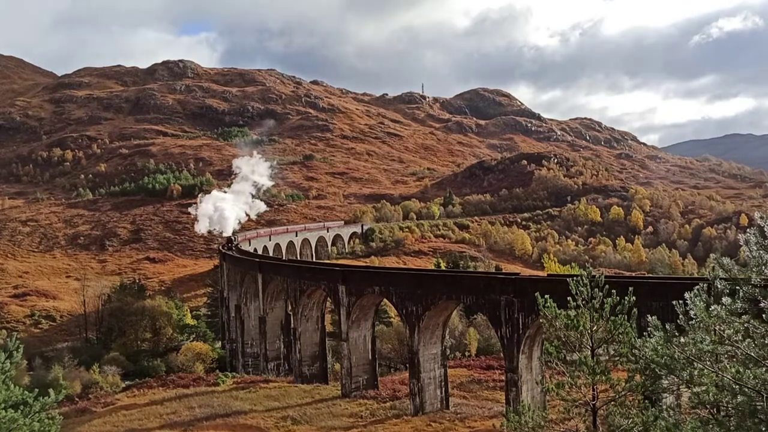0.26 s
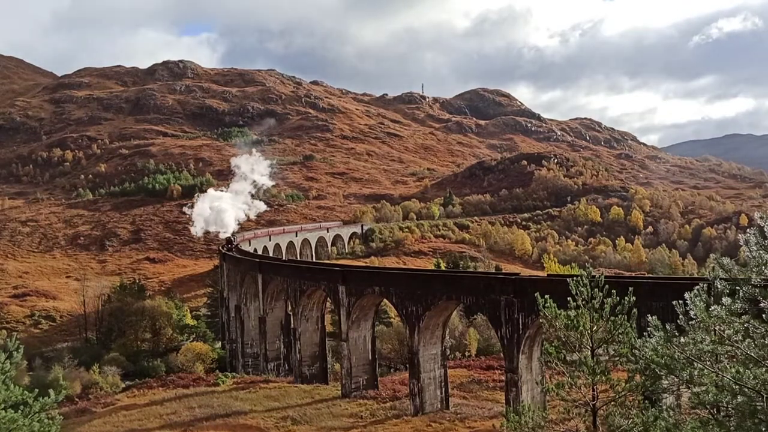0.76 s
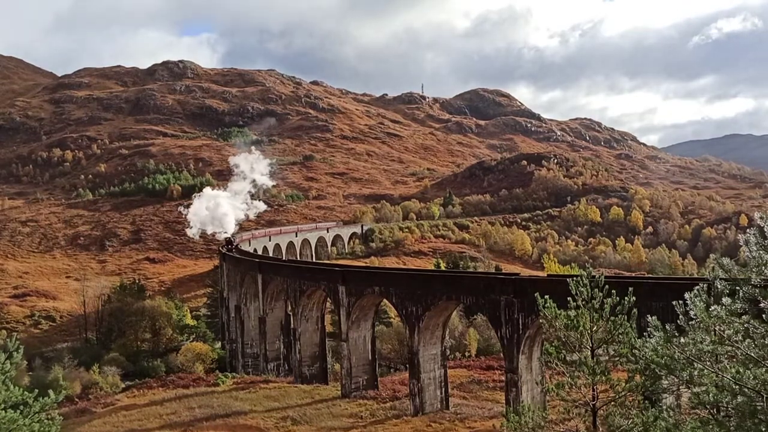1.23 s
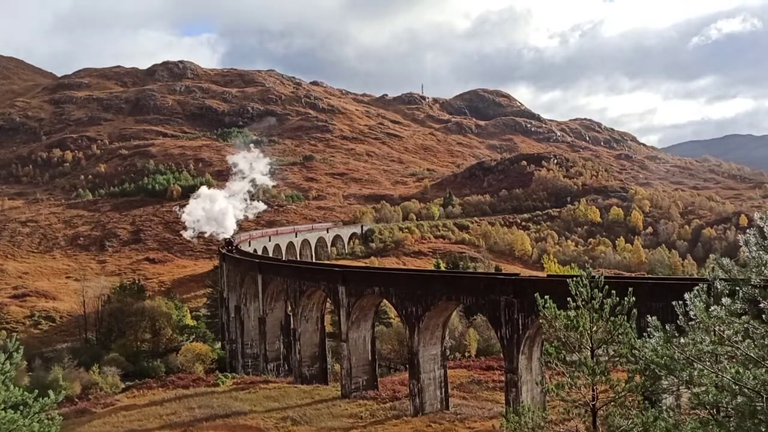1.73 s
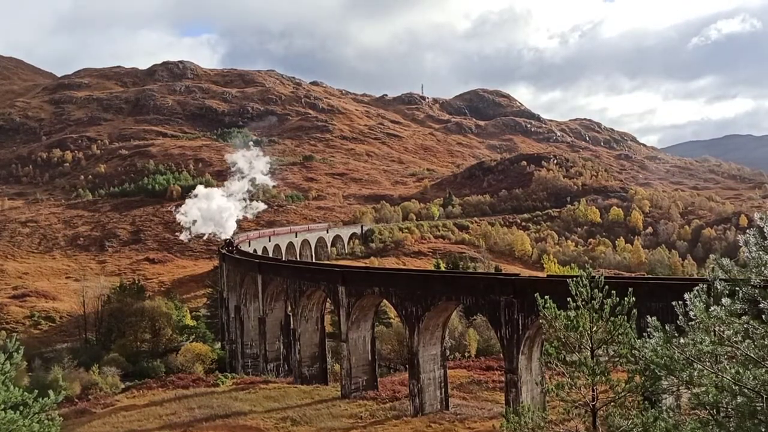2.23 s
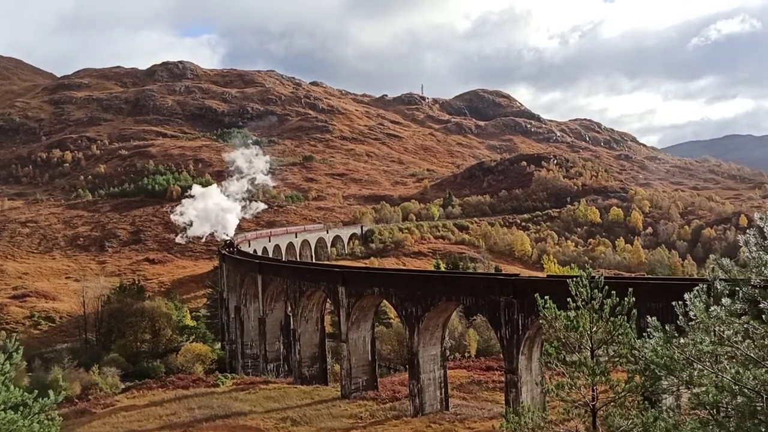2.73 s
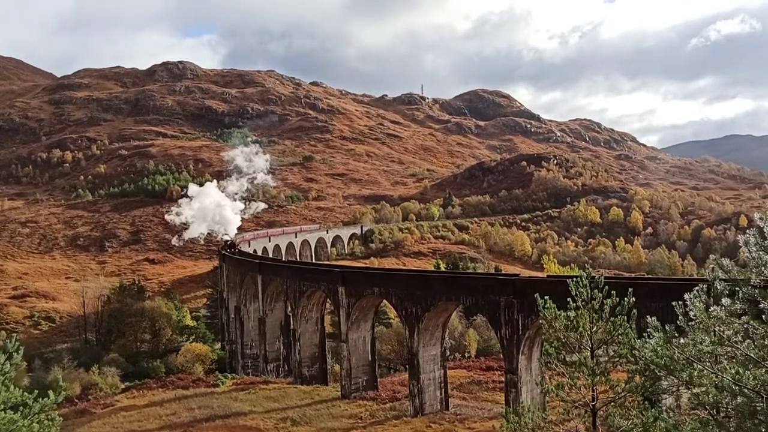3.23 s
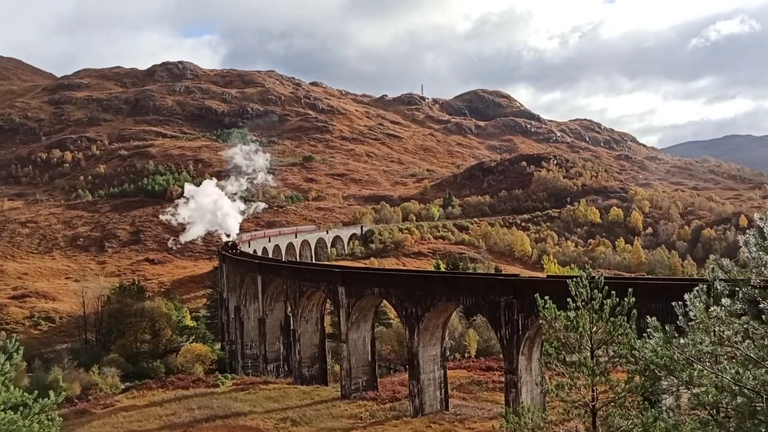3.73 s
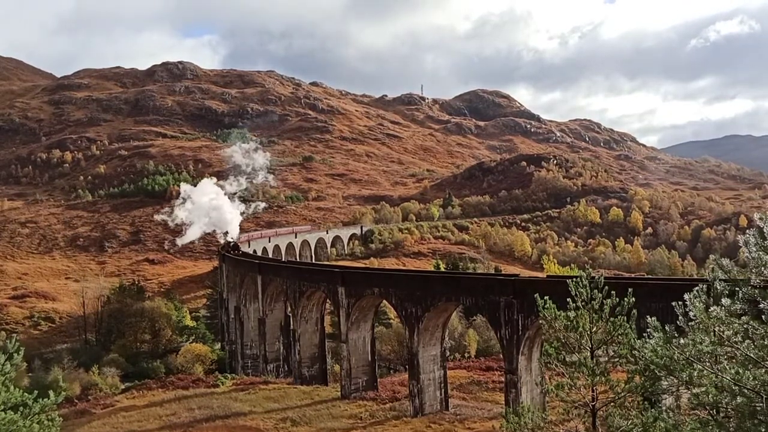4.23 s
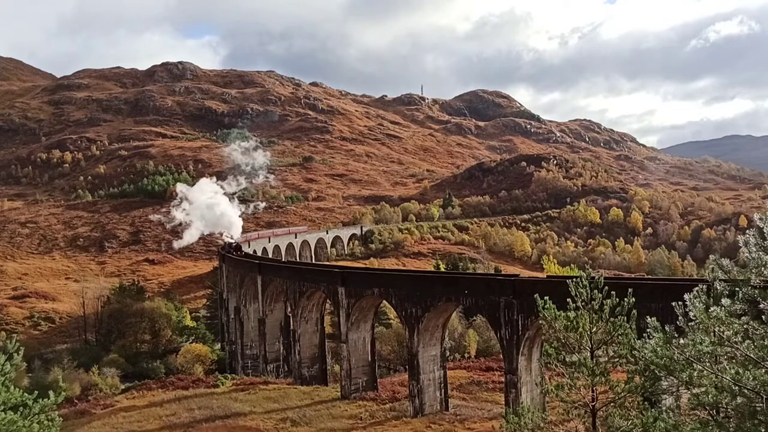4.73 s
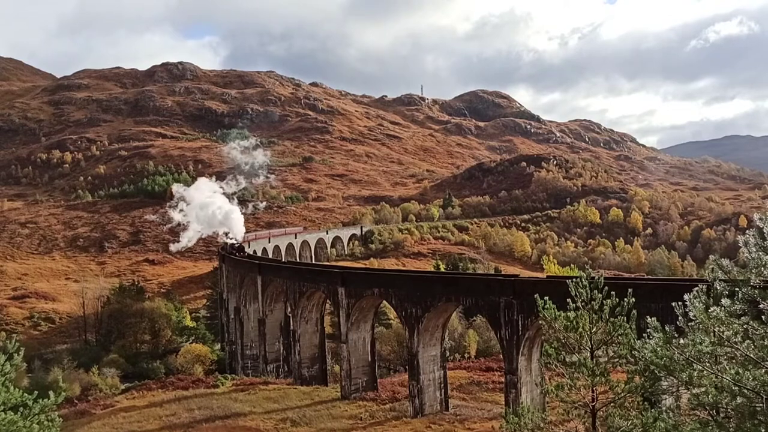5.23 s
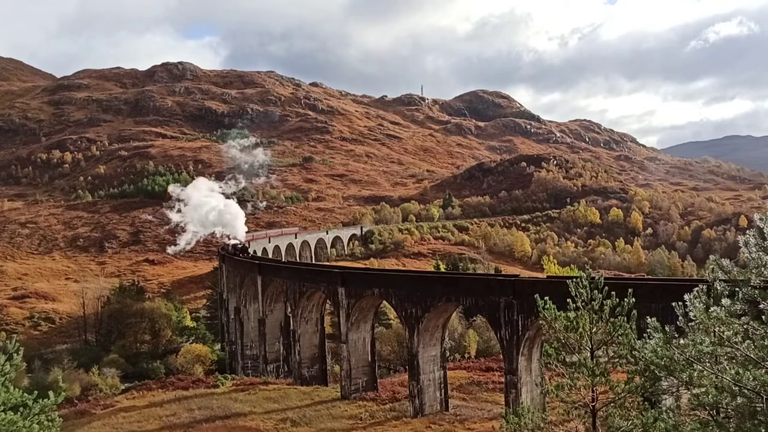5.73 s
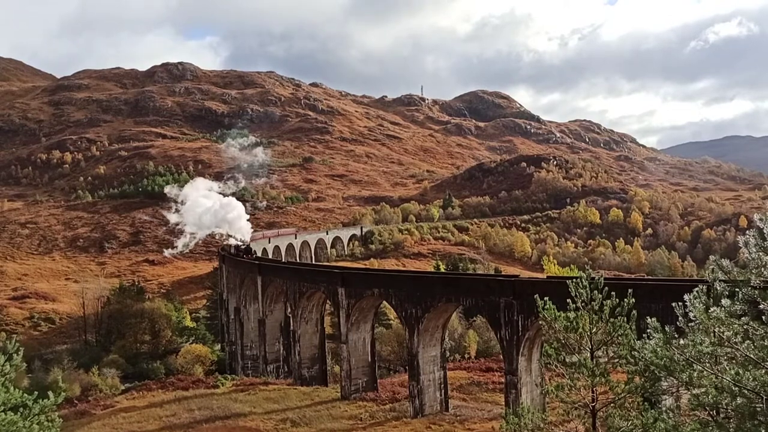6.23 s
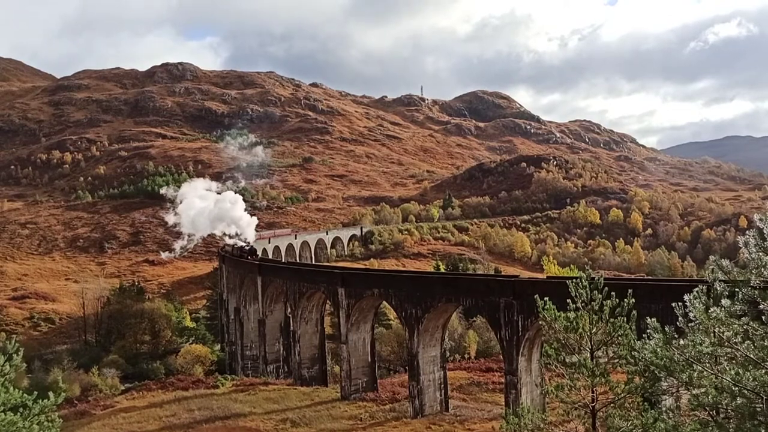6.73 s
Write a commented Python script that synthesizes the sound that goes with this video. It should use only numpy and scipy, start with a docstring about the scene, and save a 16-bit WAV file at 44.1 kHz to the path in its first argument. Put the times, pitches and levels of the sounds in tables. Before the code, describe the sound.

From the start a steam locomotive is already working at some distance in a wide open valley, its exhaust giving rapid, regular chuffs, roughly six per second. Each is a short, soft-edged burst of noise with a hollow chimney-like ring and a breathy top, slightly different in strength. Brief diffuse echoes from the slopes and a low, smooth wash of wind and leaking steam fill the gaps. For the first two seconds the puffs are a little quieter and the right side is dull. At about 1.9 to 2.2 seconds a finger rubs over the right microphone: a low juddering bump, a fine scrape, then tiny sharp ticks as it slides off. The right side opens up brighter. The chuffs continue stronger and unbroken, quickening very slightly, and from about 6 seconds sound hissier as the steam wash rises, until the sound stops mid-rhythm at 7 seconds.

```python
"""A steam engine works across a stone viaduct in a wide valley, six exhaust beats a second, heard from a hillside.
Each beat is turbulent noise let through by the valve and rung by the chimney modes.
The slopes return it as sparse decaying echoes over a smooth noise wash of wind and leaking steam.
A finger covers most of the right microphone port, then slides off about two seconds in:
stick-slip clicks make the rub, short decaying sines the bumps, and the right side opens up."""
import sys
import numpy as np
from scipy import signal
from scipy.fft import rfft, irfft, next_fast_len
from scipy.io import wavfile
from scipy.ndimage import uniform_filter1d

SR = 44100
rng = np.random.default_rng(int(sys.argv[2]) if len(sys.argv) > 2 else 0)


def dump_mix(stems):
    """Bounce the given channels to the path in sys.argv[1] as a 16-bit WAV at rate SR."""
    frames = np.atleast_2d(stems).T  # one column per channel
    limited = np.clip(frames, -1, 1)  # hard clip at full scale
    pcm = np.round(limited * 32767).astype(np.int16)
    wavfile.write(sys.argv[1], SR, pcm)


def gain_from_db(level_db):
    """Turn a decibel level (scalar or array-like) into a linear amplitude factor."""
    decades = np.asarray(level_db, float) / 20
    return 10 ** decades


N = 306936
SIZE, HOP = 512, 128  # short-time spectrum window and step, samples
HZ = np.fft.rfftfreq(SIZE, 1 / SR)[:, None]

# exhaust beats: half_open_s, strength_db, hiss_db (against the strength), valve_open_ms
BEATS = [(0.008, -23.5, -13, 70), (0.181, -26, -8, 61), (0.366, -21.5, -10.5, 58), (0.542, -23, -9.5, 66),
         (0.699, -25.5, -9.5, 70), (0.87, -24.5, -10.5, 64), (1.046, -23.5, -10.5, 82),
         (1.223, -21.5, -10, 69), (1.382, -20.5, -11, 60), (1.542, -22, -10.5, 70.6), (1.723, -19, -10, 64),
         (1.894, -19.5, -8, 60), (2.051, -18.5, -9, 55), (2.211, -20, -9, 62.5), (2.389, -16.5, -11, 64),
         (2.553, -19, -9.5, 77), (2.708, -21.5, -7.5, 71), (2.873, -18, -6.5, 60), (3.043, -17.5, -6.5, 61),
         (3.211, -19, -6.5, 59.4), (3.365, -17.5, -8.5, 55), (3.522, -19, -9, 52.6),
         (3.693, -18.5, -12.5, 63), (3.859, -17.5, -13, 66), (4.008, -19.5, -9.5, 59),
         (4.161, -19.5, -13, 70), (4.333, -19, -11.5, 66), (4.499, -18.5, -8.5, 62),
         (4.647, -19, -4.5, 50.6), (4.798, -18, -8, 53), (4.966, -19, -12, 68), (5.127, -19, -10, 69.5),
         (5.278, -17, -9, 48), (5.427, -18, -11, 60), (5.597, -16.5, -12, 59), (5.753, -19.5, -11.5, 75),
         (5.892, -21, -9.5, 71), (6.051, -18.5, -9, 57), (6.214, -20, -5, 62.5), (6.375, -20, -2.5, 53),
         (6.517, -18.5, -4.5, 50.6), (6.666, -20, -5.5, 61), (6.829, -20, -2.5, 58)]
# body, boom, ring and hiss of a puff: low_hz, high_hz (range it is levelled over), rise_ms, fall_ms, sag_ms
PUFF_BANDS = [(308, 500, 20.1, 10.7, 114), (140, 210, 18, 28, 89), (645, 2600, 20.8, 9.1, 140),
              (1870, 5550, 20, 6.2, 181)]
# crossovers between boom, body, ring and hiss: split_hz
SPLITS_HZ = [280, 625, 1650]
# how each puff band follows a beat: level_db (against the strength), hiss_share,
# dull_db (change at full dullness), nearing_db_per_s (drift as the engine nears)
FOLLOW = [(6.5, -0.049, 1, -0.1244), (4, 0.12, 1.9, .55), (5, 0.076, -4.5, -0.1665),
          (4.5, 1, -1.55, 0.0463)]
# how far the chimney ring is held back: time_s, dullness
DULL = [(0, 1), (1.5, 0.22), (3, 0.56), (4.2, -0.55), (5.2, .3), (6.96, -0.27)]
# resonances of the chimney: mode_hz, width_hz, level_db
CHIMNEY_MODES = [(101, 22, -16), (188.8, 19.6, -3), (203.2, 23, 2), (348.8, 46.5, -11.5), (396, 75, -10.5),
                 (500, 77, -15.5), (773, 66, -19.5), (898, 121, 0), (1149, 78, -13), (1376, 92, -4),
                 (1778, 260, -14.5), (2460, 650, -17.5), (3000, 620, -24.5)]
# direct colour of the steam jet beside the modes: freq_hz, level_db
JET_COLOUR = [(30, -39), (60, -29), (110, -32.5), (300, -18.5), (1000, -21), (2000, -21.5), (4500, -17.5),
              (9000, -21.5), (11000, -45)]
# decay of the valley echoes: freq_hz, t60_s
VALLEY_DECAY = [(100, 1), (200, 0.36), (500, 0.21), (2000, 0.26), (8000, 0.26)]
# finger strokes over the case: start_s, length_s, judder_db, scrape_db, scrape_growth_db
STROKES = [(1.884, .151, -12, -32, 12), (2.061, .122, -30.5, -27, -7)]
# colour of the low judder: freq_hz, level_db (relative)
JUDDER_COLOUR = [(30, -25), (60, -10.5), (100, -3), (250, 0), (500, -14.5), (1500, -16), (4000, -51.5)]
# colour of the fine scrape: freq_hz, level_db (relative)
SCRAPE_COLOUR = [(200, -6.5), (600, 2.5), (1500, 0.5), (3500, -4.5), (8000, -23.5), (12000, -2),
                 (16000, -15)]
# bumps and ticks on the right port: start_s, level_db, pitch_hz, decay_ms
BUMPS = [(1.875, -2.5, 188, 1.4), (1.986, -7, 500, 1.1), (2.095, -5, 933, 0.36), (2.153, -6.5, 13660, 0.12),
         (2.163, -5, 13500, .12), (2.173, 4.5, 14530, .15)]
# what the left port gets of the finger noise: freq_hz, gain_db
RUB_LEFT = [(60, -27.5), (300, -17.5), (1500, -35), (4500, -7), (8000, -12)]
# colour of wind and leaking steam: freq_hz, level_db (relative, per Hz)
WASH_COLOUR = [(25, -36), (50, -17), (90, -22.5), (190, 6), (300, -15.5), (500, -3.5), (1000, -12.5),
               (2000, -18), (4000, -19.5), (9000, -19), (11000, -39)]
# loudness of the wash, set over 1.5 to 8 kHz: time_s, level_db
WASH_LEVEL = [(0.0, -44.5), (2, -44.5), (3.6, -42.5), (5, -41), (6.96, -35.5)]
# left-right likeness of wash and echoes: freq_hz, likeness (0 to 1)
LIKENESS = [(60, 1), (500, 0.9), (2000, 0.24), (8000, 0.53)]
# lag of the right port behind the left: time_s, lag_ms
RIGHT_LAG = [(0, 0.17), (1.7, 0.18), (2.3, 0.11), (4, 0.11), (6.96, 0.092)]
# phase wander between the ports: freq_hz, wander_radians
SCATTER = [(500, 0.046), (2000, 0.65), (4000, 0.9), (8000, 1.1)]
# how much of the right port the finger covers: time_s, share (0 to 1)
COVER = [(0, 0.76), (2.03, 0.92), (2.18, 0.16), (6.96, 0.14)]
# right port colour when fully covered: freq_hz, gain_db
COVERED = [(900, 0.25), (1400, -1.5), (2200, -6.5), (4200, -9.5), (5400, -16), (7500, -29.5)]
# right port colour when fully open: freq_hz, gain_db
OPEN = [(900, -0.26), (1400, 3), (2300, -2), (3800, 1.5), (5400, 1), (7500, 2)]
# overall colour of the sound, bass cut, dip near 5 to 6 kHz, gap from 8.5 to 11.5 kHz: freq_hz, gain_db
OVERALL_COLOUR = [(20, -38.5), (45, -10.5), (80, 1), (4500, 0.5), (4900, -7), (5900, -9), (6200, 0),
                  (7500, -2), (7900, -11), (8400, -22), (8700, -64), (11400, -75), (11700, -37),
                  (16000, -25)]

LEAD_IN_MS = 40  # flow is followed from this long before the valve is half open
VALLEY_DB = -5.5  # echo send
JUDDER_RISE_S, JUDDER_SAG_DB, SCRAPE_RISE_S, LIFT_S = 0.054, -5.5, 0.025, 0.0098
SELF_NOISE_DB = -74  # rms of the white noise before it is cut to the top band
CEILING = 1  # full scale


def engine():
    """One turbulent jet, gated by the valve band by band, rings the chimney."""
    size = next_fast_len(N + SR)
    hz = np.fft.rfftfreq(size, 1 / SR)
    pipe = gain_from_db(read(JET_COLOUR, hz)) + 0j
    for mode_hz, width_hz, db in CHIMNEY_MODES:  # damped modes, so the ring follows its puff
        damping = 1j * width_hz * hz
        pipe += gain_from_db(db) * damping / (mode_hz ** 2 - hz ** 2 + damping)
    above = [1 / (1 + (split / (hz + 1)) ** 8) for split in SPLITS_HZ]
    shares = [above[0] - above[1], 1 - above[0], above[1] - above[2], above[2]]

    _, z = frames(rng.standard_normal(N))
    eddies_db = 1.49 * patches(z.shape, wide=4, long=16)  # eddies along the path
    jet = evened(unframe(z * gain_from_db(eddies_db)))

    s, strength_db, hiss_db, _ = np.transpose(BEATS)
    dullness = curve(DULL, s)[0]
    steam = 0
    for band, share, follow in zip(PUFF_BANDS, shares, FOLLOW):
        low_hz, high_hz, *shape = band
        db, hiss_share, dull_db, nearing_db = follow
        level_db = strength_db + db + hiss_share * hiss_db + dull_db * dullness + nearing_db * s
        power = np.sum(abs(pipe[(hz > low_hz) & (hz < high_hz)]) ** 2) / len(hz)
        gated = jet * puffs(level_db, *shape)
        steam = steam + rfft(gated, size) * pipe * share / np.sqrt(power)
    return irfft(steam, size)[:N]


def puffs(level_db, rise_ms, fall_ms, sag_ms):
    """Steam flow: the valve opens smoothly, holds while pressure sags, and the flow dies away."""
    margin = SR // 10  # room for lead-in before time zero
    flow = np.zeros(N + SR)
    ms = np.arange(SR // 2) * 1000 / SR
    since_half_open = ms - LEAD_IN_MS
    for (s, *_, open_ms), db in zip(BEATS, level_db):
        rise = 1 / (1 + np.exp(-4 * since_half_open / rise_ms))
        fall = np.exp(-ms / sag_ms) / (1 + np.exp((since_half_open - open_ms) / fall_ms))
        at = round((s + 0.1 - LEAD_IN_MS / 1000) * SR)
        flow[at:at + len(ms)] += gain_from_db(db) * rise * fall
    return flow[margin:][:N]


def valley(x):
    """Sparse returns from ground and slopes, each band dying at its own speed; paths change as the engine moves."""
    slots = np.arange(60, SR - 20, 20)  # one echo at random in every 20 samples
    taps = np.zeros((3, 2, SR))
    places = slots + rng.integers(0, 20, (3, 2, len(slots)))
    signs = rng.choice([-1.0, 1.0], (3, 2, len(slots)))
    np.put_along_axis(taps, places, signs, 2)
    t, z = frames(taps)
    z[:, 1] = matched(z[:, 0], z[:, 1])
    t60 = read(VALLEY_DECAY, HZ)
    tails = unframe(z * gain_from_db(-60 * t / t60) / np.sqrt(t60))
    tails = tails / np.linalg.norm(tails[0, 0])
    # three echo sets take turns at steady total power
    turn = np.pi * (np.arange(N) / SR / 1.5 + np.arange(3)[:, None] / 3)
    fed = x * np.sqrt(2 / 3) * np.sin(turn)
    return signal.fftconvolve(fed[:, None], tails, axes=2)[..., :N].sum(0)


def finger():
    """A low judder, a fine scrape and a few bumps, loud in the right port, faint in the left."""
    t = np.arange(N) / SR
    judder, scrape = np.zeros(N), np.zeros(N)
    for s, length, judder_db, scrape_db, growth_db in STROKES:
        judder += stroke(t, s, length, JUDDER_RISE_S, judder_db, JUDDER_SAG_DB)
        scrape += stroke(t, s, length, SCRAPE_RISE_S, scrape_db, growth_db)
    right = slips(judder, JUDDER_COLOUR, per_s=680, spread_db=1.8)
    right = right + slips(scrape, SCRAPE_COLOUR, per_s=8600, spread_db=4.9)
    ms = np.arange(2000) * 1000 / SR
    for s, db, hz, decay_ms in BUMPS:
        push = np.e * ms / decay_ms * np.exp(-ms / decay_ms)  # peaks at 1
        right[round(s * SR):][:len(ms)] += gain_from_db(db) * push * np.sin(2 * np.pi * hz * ms / 1000)
    left = unframe(frames(right)[1] * gain_from_db(read(RUB_LEFT, HZ)))
    return np.array([left, right])


def slips(level, colour, per_s, spread_db):
    """Stick-slip: skin catches and lets go in clicks of uneven size, filtered through a colour."""
    size = gain_from_db(spread_db * np.minimum(rng.exponential(1, N), 4)) * rng.choice([-1, 1], N)
    clicks = evened(size * (rng.random(N) < per_s / SR))
    _, z = frames(clicks * level)
    return unframe(z * evened(gain_from_db(read(colour, HZ))))


def stroke(t, start, length, rise_s, db, change_db):
    """Pressure of one stroke: it builds, drifts, and stops as the finger lifts."""
    u = t - start
    edges = np.clip(u / rise_s, 0, 1) ** 2 * np.clip((length - u) / LIFT_S, 0, 1)
    return edges * gain_from_db(db + change_db * np.clip(u / length, 0, 1))


def wash():
    """Wind in the trees and leaking steam: smooth noise with drifting patches."""
    t, z = frames(rng.standard_normal((2, N)))
    z[1] = matched(z[0], z[1])
    shape = gain_from_db(read(WASH_COLOUR, HZ))
    shape /= np.sqrt(np.sum(shape[(HZ > 1500) & (HZ < 8000)] ** 2) / len(HZ))
    level_db = curve(WASH_LEVEL, t)[0] + 0.31 * patches(z.shape[1:], wide=6, long=20)
    return unframe(z * shape * gain_from_db(level_db))


def matched(left, right):
    """Blends left into right by frequency: long waves reach both ports alike."""
    same = np.clip(read(LIKENESS, HZ), 0, 1)
    return same * left + np.sqrt(1 - same ** 2) * right


def patches(shape, wide, long):
    """Random hills over frequency and time, rms 1."""
    across = uniform_filter1d(rng.standard_normal(shape), wide, -2)
    return evened(uniform_filter1d(across, long, -1))


def evened(x):
    """Scales to rms 1."""
    return x / np.sqrt(np.mean(x ** 2) + 1e-20)


def read(points, hz):
    """A spectrum, straight on a log-frequency axis."""
    f, value = np.transpose(points)
    return np.interp(np.log(hz + 1), np.log(f + 1), value)


def curve(rows, t):
    """The columns of a table at times t."""
    s, *columns = np.transpose(rows)
    return [np.interp(t, s, c) for c in columns]


def frames(x):
    """Frame times and short-time spectra."""
    return signal.stft(x, SR, nperseg=SIZE, noverlap=SIZE - HOP)[1:]


def unframe(z):
    """Back from short-time spectra to sound."""
    return signal.istft(z, SR, nperseg=SIZE, noverlap=SIZE - HOP)[1][..., :N]


def scene():
    """Airborne sound reaches the left port first and the right one past the finger."""
    steam = engine()
    t, z = frames(steam + gain_from_db(VALLEY_DB) * valley(steam) + wash())
    cover = np.clip(curve(COVER, t)[0], 0, 1)
    lag_s = curve(RIGHT_LAG, t)[0] / 1000
    z[1] *= np.exp(-2j * np.pi * HZ * lag_s)
    z[1] *= np.exp(1j * read(SCATTER, HZ) * patches(z.shape[1:], wide=3, long=8))
    z[1] *= gain_from_db(cover * read(COVERED, HZ) + (1 - cover) * read(OPEN, HZ))
    return unframe(z) + finger()


def band_limit(x):
    """A steep low-pass at the top of the band."""
    return signal.sosfilt(signal.butter(12, 15800, fs=SR, output="sos"), x)


def record(dry):
    """A soft ceiling on peaks, the overall colour, and a faint microphone hiss in the top band."""
    hz = np.fft.rfftfreq(N, 1 / SR)
    peaks_rounded = CEILING * np.tanh(dry / CEILING)
    coloured = rfft(peaks_rounded) * gain_from_db(read(OVERALL_COLOUR, hz))
    top_band = (hz > 11600) & (hz < 15800)
    hiss = rfft(rng.standard_normal((2, N))) * gain_from_db(SELF_NOISE_DB) * top_band
    mix = irfft(coloured + hiss, N)
    return band_limit(mix)


dry = scene()
out = record(dry)
dump_mix(out)
```